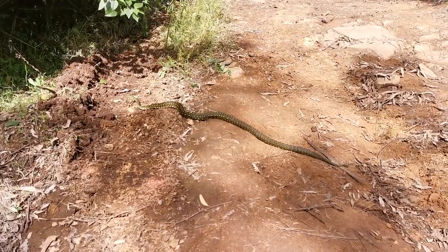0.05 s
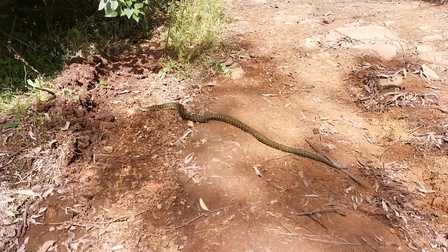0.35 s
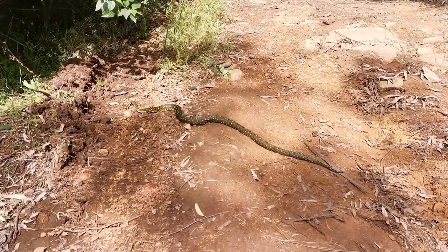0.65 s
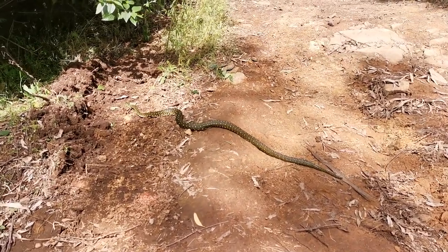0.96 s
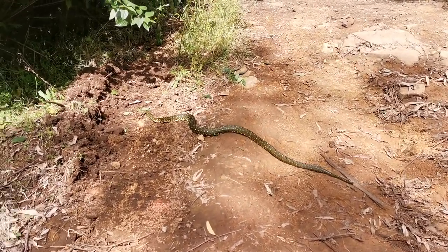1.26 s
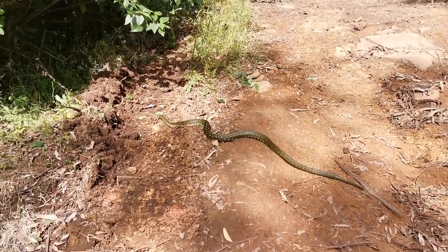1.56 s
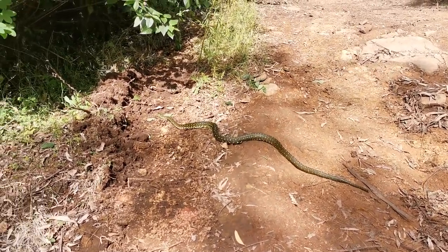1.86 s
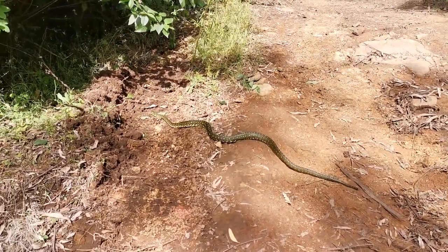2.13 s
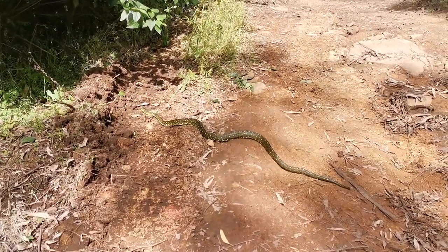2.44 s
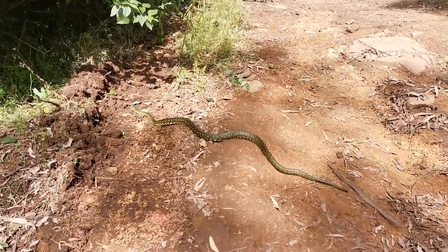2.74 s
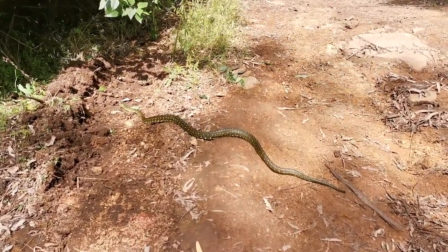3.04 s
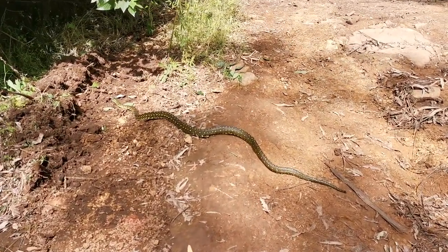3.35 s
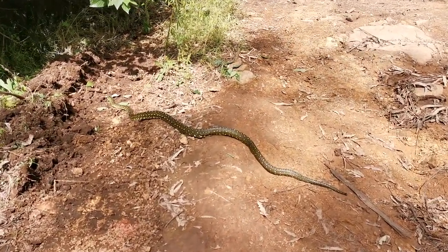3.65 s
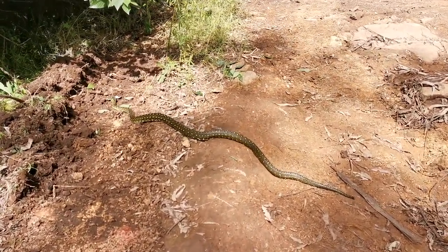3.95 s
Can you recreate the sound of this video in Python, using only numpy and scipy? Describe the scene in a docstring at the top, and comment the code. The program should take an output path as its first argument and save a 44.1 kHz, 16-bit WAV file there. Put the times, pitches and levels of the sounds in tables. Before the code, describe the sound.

Faint low hum wavering in quiet bush, with far bird calls and brief dry leaf rustles.

```python
"""A low hum, like a far engine, swells and fades over soft air on a still, dry bush track.
The hum is one wandering tone under a weak noise drone; the air is shaped noise.
Birds call hoarsely far off (narrow noise) and ping a bell-like note (a quavering sine); both ring on
in the wood. Close by on the left, dry leaf litter is scuffed (dense grains) and twigs tick (noise bursts)."""
import sys
import numpy as np
from scipy import signal
from scipy.fft import rfft, irfft
from scipy.io import wavfile
from scipy.ndimage import uniform_filter1d

SR = 44100
rng = np.random.default_rng(int(sys.argv[2]) if len(sys.argv) > 2 else 0)


def transcribe(signal):
    """Save signal, clipped to [-1, 1], as a 16-bit WAV file at the path in sys.argv[1]."""
    frames = np.atleast_2d(signal).T
    limited = np.clip(frames, -1, 1)
    pcm = np.round(limited * 32767).astype(np.int16)
    wavfile.write(sys.argv[1], SR, pcm)


N = 176400


def undb(db):
    return 10 ** (np.asarray(db) / 20)


def unit(x):
    return x / np.sqrt(np.mean(x ** 2))


def times():
    return np.arange(N) / SR


def freqs():
    return np.maximum(np.arange(N // 2 + 1) * SR / N, 1)


def pan(db):
    """Constant-power stereo gains; db is left over right."""
    return unit(undb(np.array([[db], [-db]]) / 2))


def colour(points):
    """Gain per FFT bin from (freq_hz, gain_db) points."""
    hz, db = np.array(points, float).T
    return undb(np.interp(np.log(freqs()), np.log(hz), db))


def band(x, hz, width_hz, order=3):
    """Band-pass about a geometric centre."""
    low_hz = np.hypot(hz, width_hz / 2) - width_hz / 2
    edges_hz = [low_hz, min(low_hz + width_hz, .45 * SR)]
    return signal.sosfilt(signal.butter(order, edges_hz, "bandpass", fs=SR, output="sos"), x)


def walk(rate_hz):
    """Unit-RMS random drift, rolling off at rate_hz + 1."""
    lowpass = np.exp(-(freqs() / (rate_hz + 1)) ** 2)
    return unit(irfft(rfft(rng.standard_normal(N)) * lowpass, N))


def envelope(start_s, attack_s, hold_s, release_s):
    """Linear rise, hold, exponential fall."""
    t = times() - start_s
    return np.clip(t / attack_s, 0, 1) * np.exp(-np.maximum(t - attack_s - hold_s, 0) / release_s)


def grains(per_s, spread_db=2.5):
    """Tiny random cracks of uneven size, independent per ear."""
    size = undb(spread_db * np.minimum(rng.exponential(size=(2, N)), 4))
    return (rng.random((2, N)) < per_s / SR) * size * rng.standard_normal((2, N))


def wood(note, start_s, direct_gain, t60_s=1.25, tail_db=-0.5):
    """A 1 s note among trees: direct sound plus a scattered tail."""
    t = np.arange(SR) / SR
    scatter = rng.standard_normal((2, SR)) * undb(-60 * t / t60_s)
    out = signal.fftconvolve(note[None], scatter, axes=1)
    out *= undb(tail_db) * np.sqrt(np.sum(note ** 2) / np.sum(out ** 2, axis=1, keepdims=True))
    out[:, :SR] += direct_gain * note
    return np.pad(out, ((0, 0), (SR + int(start_s * SR), N)))[:, SR:SR + N]


def hum(pitch_hz=77.8, wander=.004):
    """One low tone that swells and fades, with a weak drone above it."""
    # tone loudness: time_s, level_db
    swells = [(0.0, -44), (0.2, -38.5), (0.47, -34), (0.79, -45), (1.09, -42.5), (1.18, -46), (1.54, -38),
              (1.86, -40.5), (2.07, -55.5), (2.29, -45), (2.77, -38), (3.11, -42), (3.23, -49),
              (3.29, -66.5), (3.43, -45.5), (3.58, -54.5), (3.97, -40), (4.0, -37.5)]
    # drone noise bands: centre_hz, width_hz, level_db
    drone_bands = [(125, 12, -68), (153.9, 20, -72)]
    level_db = np.interp(times(), *np.array(swells).T)
    gain = uniform_filter1d(undb(level_db), size=1500)
    phase = 2 * np.pi * np.cumsum(pitch_hz * (1 + wander * walk(0.96))) / SR
    tone = np.sqrt(2) * gain * np.sin(phase)
    drone = sum(undb(db) * unit(band(rng.standard_normal(N), hz, width_hz))
                for hz, width_hz, db in drone_bands)
    return (tone + drone) * pan(db=1.05)


def air(hiss_db=-65.5, rumble_db=-63, swell_db=.4, flicker_db=.5):
    """Rumble and leaf hiss in octave bands that swell together and flicker alone; wide treble."""
    # hiss and rumble spectra: freq_hz, relative_db
    hiss_shape = [(200, 2.5), (400, -2), (750, -4.5), (1200, -8), (1800, -10), (2500, -14), (3500, -18.5),
                  (5600, -22.5), (6300, -27.5), (7600, -31), (8500, -40.5), (10000, -42), (15000, -41.5)]
    rumble_shape = [(12, -11.5), (25, 0.5), (50, 2.5), (100, 0), (150, -10), (200, -23)]
    # stereo width: freq_hz, side_over_mid_db
    width = [(30, -5.5), (120, -3.5), (250, -10.5), (700, -8), (1500, -3.5), (5000, 2), (12000, -1.5)]
    # balance: freq_hz, left_over_right_db
    lean = [(100, 0), (600, 1), (1500, 5), (5000, -1), (10000, -5.5)]
    f = freqs()
    hiss = undb(hiss_db) * unit(colour(hiss_shape) / np.sqrt(1 + (170 / f) ** 8))
    rumble = undb(rumble_db) * unit(colour(rumble_shape) / (1 + (f / 250) ** 4))
    mid, side = rfft(rng.standard_normal((2, N)))
    ears = np.array([[1], [-1]])
    stereo = (mid + ears * side * colour(width)) * colour(lean) ** (ears / 2)
    spectrum = np.hypot(hiss, rumble) * stereo
    octave = np.clip(np.log2(f / 60), 0, 8)
    swell = walk(1)
    out = 0
    for k in range(9):
        noise = irfft(spectrum * np.maximum(1 - abs(octave - k), 0), N)
        out += noise * undb(swell_db * swell + flicker_db * walk(3))
    return out


def far_calls(width_hz=300):
    """Hoarse bird calls, smeared by distance into a narrow band."""
    # calls: start_s, hold_s, pitch_hz, level_db, pan_db, direct_gain
    calls = [(-.1, .4, 1793, -66, 7, 0.82), (1.023, .33, 1754, -71.5, 7, .3),
             (1.585, 0.042, 1650, -69.5, 6, 0.6), (2.294, 0.045, 1940, -65.5, 3.5, 0.9),
             (2.422, 0.092, 1910, -73.5, 9, 0.8), (3.298, 0.1, 1710, -72, 7, 0.45)]
    out = 0
    for start_s, hold_s, hz, db, pan_db, direct_gain in calls:
        rasp = unit(band(rng.standard_normal(N), hz, width_hz, order=1))
        note = (rasp * envelope(0, 0.028, hold_s, 0.013))[:SR]
        out += undb(db) * pan(pan_db) * wood(band(note, hz, 3 * width_hz), start_s, direct_gain)
    return out


def bellbirds(rise_hz_per_s=570, pitch_flutter=.004, flutter_db=2):
    """Short quavering notes, rising slightly, that ring on in the wood."""
    # bell notes: start_s, pitch_hz, level_db, direct_gain, pan_db
    notes = [(-.07, 2943, -64.5, 0.8, -4.5), (2.426, 2935, -66, 0.32, 7.5), (3.87, 2902, -59.5, 0.89, 11.5)]
    ping = envelope(0, attack_s=0.0021, hold_s=0.064, release_s=0.024)
    out = 0
    for start_s, hz, db, direct_gain, pan_db in notes:
        pitch_hz = hz * (1 + pitch_flutter * walk(80)) + rise_hz_per_s * times()
        phase = 2 * np.pi * np.cumsum(pitch_hz) / SR
        tone = unit(np.sin(phase) * undb(flutter_db * walk(60)))
        out += undb(db) * pan(pan_db) * wood((tone * ping)[:SR], start_s, direct_gain)
    return out


def litter(crackle_db=-81.5):
    """Dry leaves: bursts of dense grains over a faint, sparse crackle."""
    # rustles: start_s, attack_s, hold_s, release_s, level_db, centre_hz, width_hz, pan_db
    rustles = [(-.03, 0.026, 0.094, 0.15, -68.5, 345, 257, 0.5),
               (.93, 0.053, 0.016, 0.071, -68, 2250, 1600, 6), (1.916, 0.022, .18, 0.2, -67, 786, 597, 6.5),
               (1.918, .012, .06, 0.37, -58.5, 1755, 1270, 11),
               (1.927, 0.02, 0.028, 0.06, -69, 5500, 2550, 4.5),
               (1.94, 0.096, 0.19, .04, -68, 2520, 2000, 8),
               (2.746, 0.085, 0.094, 0.14, -72.5, 3300, 2800, 11),
               (3.28, 0.053, .1, 0.093, -65.5, 398, 237, 18)]
    crackle = unit(band(grains(per_s=250), hz=2350, width_hz=2500))
    out = undb(crackle_db) * crackle * pan(db=3.5)
    for start_s, attack_s, hold_s, release_s, db, hz, width_hz, pan_db in rustles:
        leaves = unit(band(grains(per_s=6000), hz, width_hz, order=2))
        out += undb(db) * pan(pan_db) * leaves * envelope(start_s, attack_s, hold_s, release_s)
    return out


def twigs(scatter_gain=0.67):
    """Brief cracks in one broad resonance each, common to both ears, plus ground scatter."""
    # twig ticks, soft ground knocks: start_s, level_db, centre_hz, width_hz, decay_s, pan_db
    ticks = [(.529, -63.5, 3640, 1800, 0.0018, 10.5), (0.6681, -44, 1530, 970, 0.00097, 16.5),
             (0.975, -75, 6000, 3000, 0.0022, 3), (.984, -65, 2800, 2200, 0.0038, 4),
             (1.336, -81.5, 7500, 1210, 0.013, 9), (1.636, -63.5, 1700, 1500, 0.0082, 8),
             (1.639, -60.5, 230, 200, .012, 3), (1.87, -70, 4000, 4000, 0.0044, 4),
             (1.921, -54.5, 390, 350, 0.0064, 2), (1.921, -54.5, 1180, 398, 0.0033, 7),
             (1.931, -58.5, 1300, 1820, 0.0065, 2), (1.952, -66.5, 5400, 2030, 0.01, -29),
             (1.954, -58.5, 1680, 220, 0.016, 21), (2.03, -81, 6500, 2500, 0.017, 2),
             (3.378, -60, 1600, 1500, 0.0032, 9)]
    out = 0
    for start_s, db, hz, width_hz, decay_s, pan_db in ticks:
        burst = rng.standard_normal(N) + scatter_gain * rng.standard_normal((2, N))
        crack = band(burst * envelope(start_s, 0.0004, 0, decay_s), hz, width_hz)
        crack /= np.sqrt(np.sum(crack ** 2, axis=1, keepdims=True) / (decay_s * SR))
        out += undb(db) * pan(pan_db) * crack
    return out


def scene():
    return hum() + air() + far_calls() + bellbirds() + litter() + twigs()


def record(dry):
    """Steep low-pass on the top treble."""
    cutoff_hz = 15100
    return signal.sosfilt(signal.ellip(8, .2, 70, cutoff_hz, fs=SR, output="sos"), dry)


dry = scene()
out = record(dry)
transcribe(out)
```